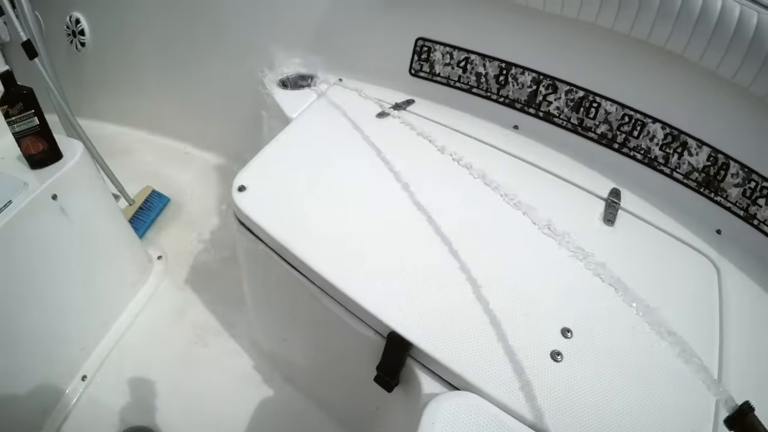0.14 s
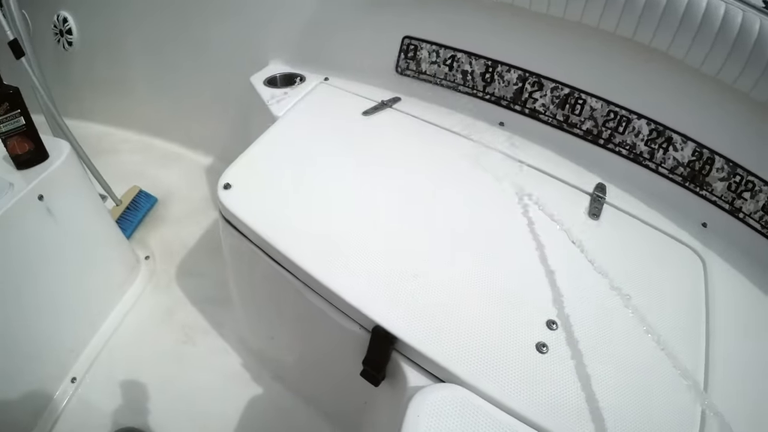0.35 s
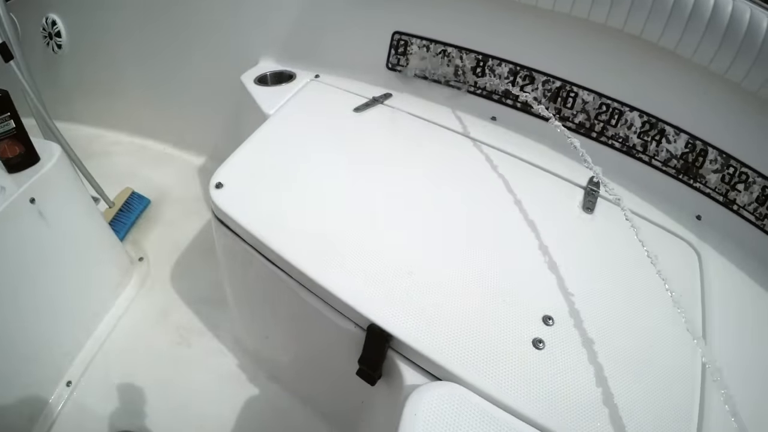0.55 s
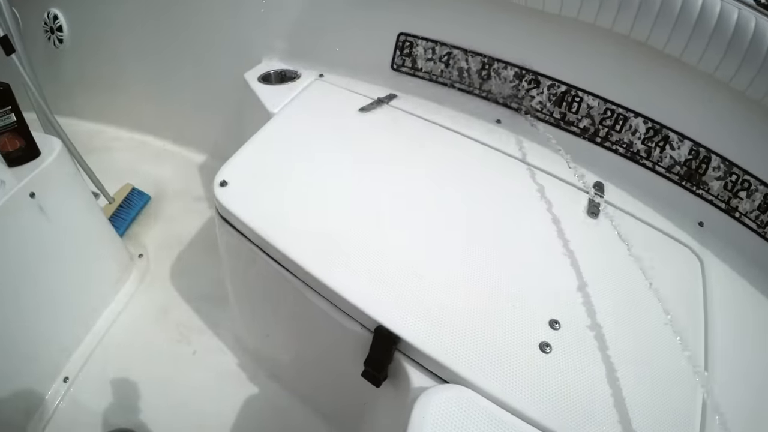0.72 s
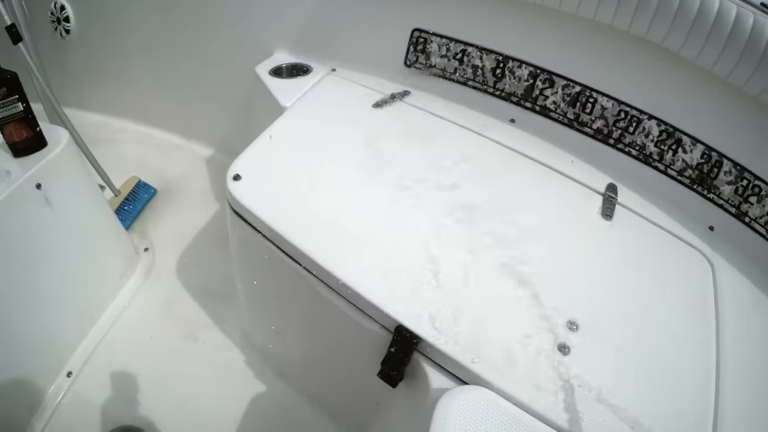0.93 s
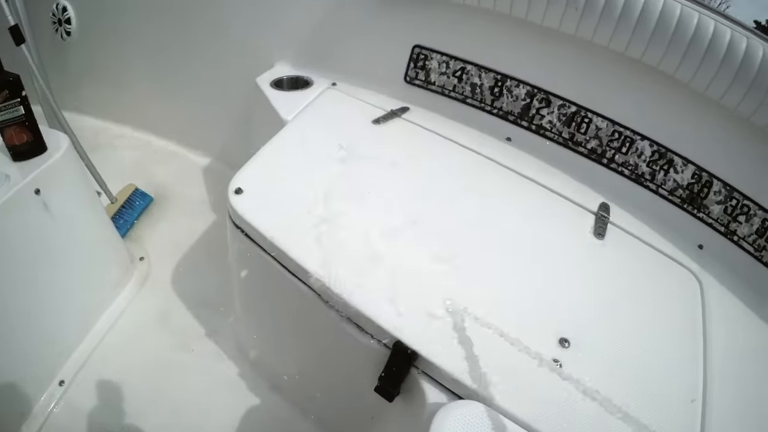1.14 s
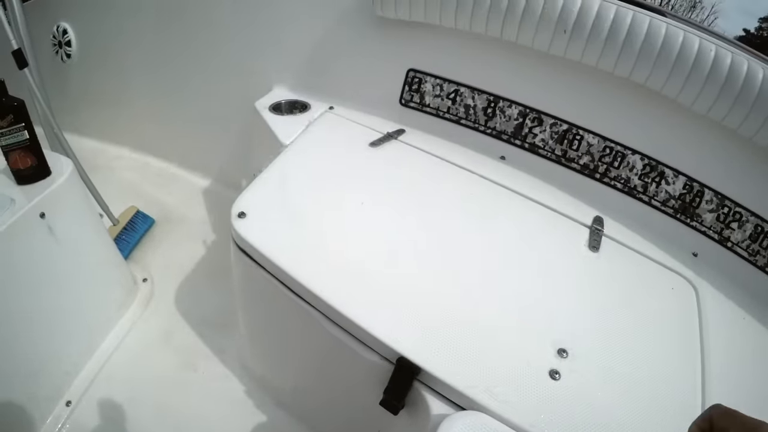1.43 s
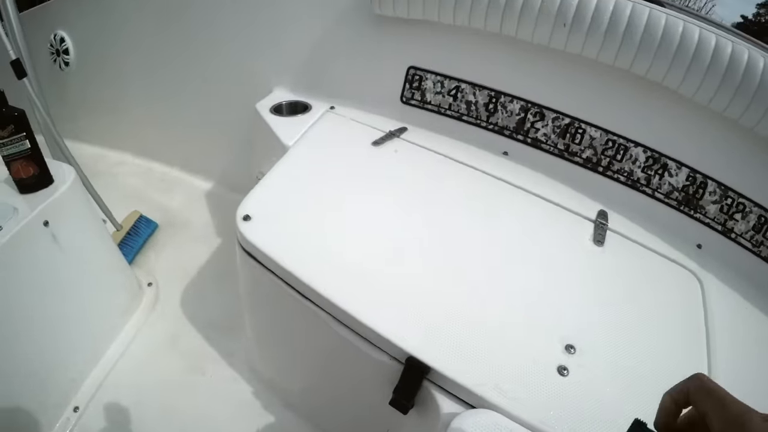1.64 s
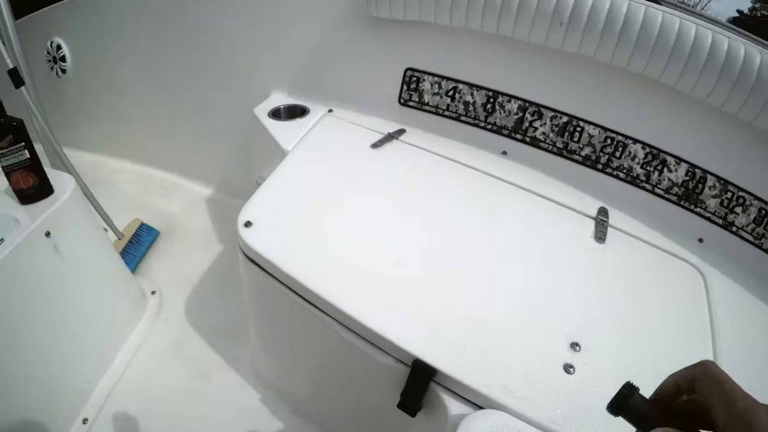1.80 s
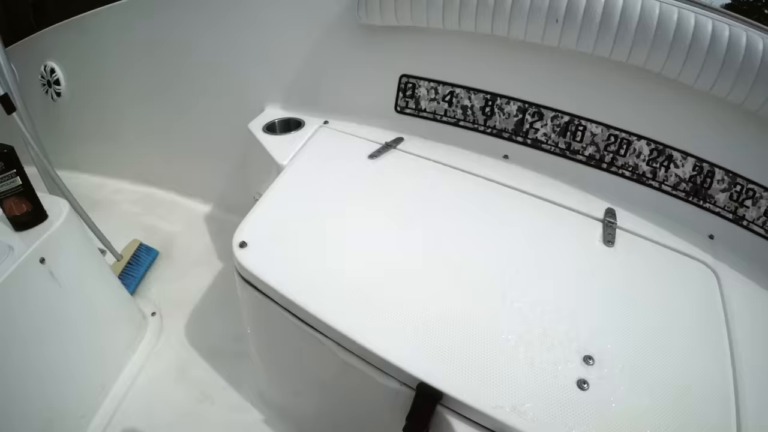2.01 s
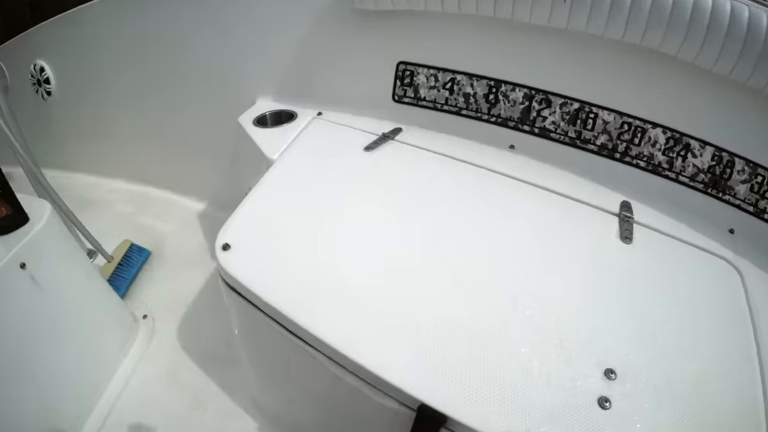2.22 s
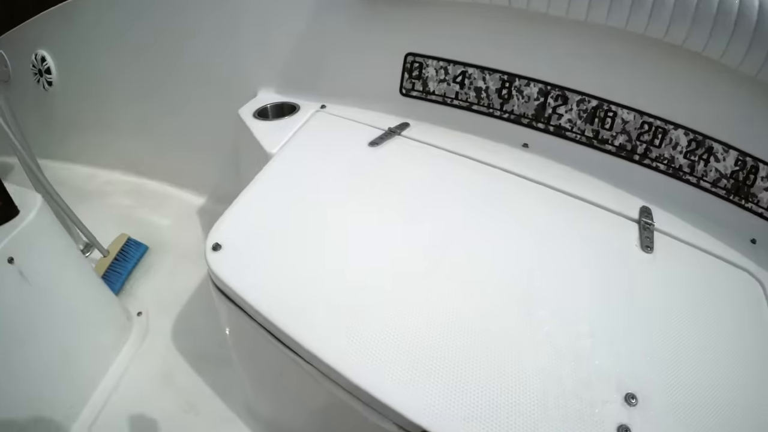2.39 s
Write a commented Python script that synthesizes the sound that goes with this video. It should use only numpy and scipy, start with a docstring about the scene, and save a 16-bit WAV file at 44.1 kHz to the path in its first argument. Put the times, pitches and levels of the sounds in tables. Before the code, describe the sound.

Hose spray spatters and drums on hard fibreglass, stops abruptly, nozzle lever clicks, near quiet follows

```python
"""Garden hose on a boat deck

A jet sweeps over a fibreglass deck: random drops patter, damped rings of bubbles make fizz, gurgle
and plops, and the modes of the hollow side wall drum. The jet stops with a soft thump, the nozzle
clacks and ticks (noise bursts with metal modes), and a faint motor hum and a low rumble of random
thuds remain in soft outdoor noise. The hard cockpit walls add a short echo to water and nozzle."""
import sys
import numpy as np
from scipy import signal
from scipy.fft import rfft, irfft
from scipy.io import wavfile
from scipy.ndimage import uniform_filter1d, map_coordinates

SR = 44100
rng = np.random.default_rng(int(sys.argv[2]) if len(sys.argv) > 2 else 0)


def transcribe(signal):
    """Save signal, clipped to [-1, 1], as a 16-bit WAV file at the path in sys.argv[1]."""
    frames = np.atleast_2d(signal).T
    limited = np.clip(frames, -1, 1)
    pcm = np.round(limited * 32767).astype(np.int16)
    wavfile.write(sys.argv[1], SR, pcm)


N = 112454  # samples in the scene


def undb(db):
    """Logarithmic level: amplitude gain from decibels."""
    return 10 ** (np.asarray(db) / 20)


def unit(x):
    """Normalisation: scale to rms 1."""
    return x / np.sqrt(np.mean(x ** 2) + 1e-18)


def curve(rows, channels=1):
    """Level envelope: one dB column, interpolated linearly in time, as a gain."""
    rows = np.array(rows)
    return undb(np.interp(np.arange(N) / SR, rows[:, 0], rows[:, channels]))


def walk(rate):
    """Low-passed randomness: `rate` random values per second, joined smoothly, at rms 1."""
    hold = max(int(SR / rate), 2)
    steps = np.repeat(rng.standard_normal(N // hold + 1), hold)
    return unit(uniform_filter1d(steps, hold)[:N])


def fade(t60):
    """Exponential decay: 60 dB down after t60 seconds, cut at a quarter of a second."""
    return np.exp(-np.log(1000) * np.arange(SR // 4) / SR / t60)


def colour(x, points):
    """Minimum-phase filtering: a causal response with the given spectral outline, at unit energy."""
    hz, db = np.array(points).T
    size = 8192
    bins_hz = np.arange(size // 2 + 1) * SR / size + 1
    outline_db = np.interp(np.log(bins_hz), np.log(hz), db)
    cepstrum = irfft(np.log(undb(outline_db)))
    # Folding the cepstrum onto positive times makes the response causal.
    folded = np.r_[cepstrum[0], 2 * cepstrum[1:size // 2]]
    response = irfft(np.exp(rfft(folded, size)))
    return signal.fftconvolve(x, response / np.linalg.norm(response))[:len(x)]


def band(x, hz, width):
    """Resonant filtering: a peak of the given relative width applied twice, scaled to rms 1."""
    b, a = signal.iirpeak(hz, hz / min(hz * width, SR / 4), fs=SR)
    once = signal.lfilter(b, a, x)
    return unit(signal.lfilter(b, a, once))


def highpass(x, hz):
    """High-pass filtering: attenuate the bass below hz."""
    return signal.sosfilt(signal.butter(2, hz, "high", fs=SR, output="sos"), x)


def ring(modes):
    """Modal superposition: the struck response is a sum of damped sines."""
    t = np.arange(SR // 4) / SR
    return sum(undb(db) * np.sin(2 * np.pi * hz * t) * fade(t60) for hz, db, t60 in modes)


def add(out, at, x):
    """Linear superposition: mix x in at a time in seconds."""
    i = max(int(at * SR), 0)
    out[i:i + len(x)] += x[:max(len(out) - i, 0)]


def impacts(rate, scatter_db):
    """Random pulse train: impacts of either sign, many small and a few large, at rms 1."""
    hits = (rng.random(N) < rate / SR) * rng.choice([-1, 1], N)
    size = np.minimum(rng.exponential(size=N), 5)
    return unit(hits * undb(scatter_db * size))


RING_RISE = 0.08  # fractional rise in pitch over the ring
RING_ATTACK_CYCLES = 0.58


def damped_ring(hz, cycles):
    """Damped resonance, as of a bubble: a slightly rising pitch falls 40 dB over its cycles."""
    turns = np.arange(int(cycles * SR / hz) + 2) * hz / SR
    age = turns / cycles
    attack = 1 - np.exp(-turns / RING_ATTACK_CYCLES)
    tone = np.sin(2 * np.pi * turns * (1 + RING_RISE * age / 2))
    return tone * attack * np.exp(-np.log(100) * age)


BUBBLE_SCATTER_DB = 3


def froth(hz, octaves, rate, cycles, seconds):
    """Incoherent superposition: bubbles of mixed sizes, about rms 1 over their span of births."""
    out = np.zeros(N)
    for at, size, length, pitch in rng.random((int(rate * seconds) + 1, 4)):
        # Logistic spread of pitch, near 1 in deviation.
        spread = np.log((pitch + .01) / (1.01 - pitch)) / np.sqrt(np.pi)
        gain = undb(-BUBBLE_SCATTER_DB * np.log(size + 0.018))
        bubble = damped_ring(hz * 2 ** (octaves * spread), cycles * (.5 + length))
        add(out, at * seconds, gain * bubble)
    return unit(out) * np.sqrt(seconds * SR / N)


# The jet sweeping over deck, seam and wall, then shut off; levels before the trims below:
# [t/s, patter and spray level/dB, fizz of small bubbles level/dB, gurgle of larger bubbles level/dB]
WATER = [(0,-34,-36.5,-49),(.215,-41.5,-45,-49.5),(.285,-18,-11,-16.5),(.32,-21.5,-20,-18),(.338,-27.5,-26.5,-29),(.415,-27.5,-20.5,-24),(.46,-35,-33.5,-43.5),(.588,-39.5,-39.5,-41),
         (.62,-22,-22.5,-23),(.66,-22.5,-22.5,-24.5),(.71,-32.5,-35.5,-39.5),(.78,-22,-17,-26),(.828,-29.5,-23.5,-26.5),(.85,-13,-17.5,-22.5),(.879,-27,-26,-32),(.895,-11,-12.5,-16),(.95,-20.5,-19.5,-34.5),
         (1.01,-31,-32.5,-45),(1.19,-28,-31.5,-48),(1.24,-32.5,-36,-41.5),(1.375,-35.5,-31.5,-50),(1.45,-26,-33,-38),(1.48,-47.5,-48,-47.5),(2.1,-81.5,-81,-73)]
# Spectral outline of drops on the deck: [f/Hz, relative level/dB]
PATTER_COLOUR = [(300,-16.5),(3000,-12),(5500,0.5),(7500,-3),(11000,-8.5),(15500,-12)]
DROPS_PER_S, DROP_SCATTER_DB, PATTER_DB = 7600, 5.5, -1
SPURT_DB, SPURTS_PER_S = 1.5, 90
# Bubble clouds: centre pitch, spread of pitch, births per second, cycles of ringing, trim
SPRAY_HZ, SPRAY_OCTAVES, SPRAY_PER_S, SPRAY_CYCLES, SPRAY_DB = 7840, 0.44, 2000, 45, -3.5
FIZZ_HZ, FIZZ_OCTAVES, FIZZ_PER_S, FIZZ_CYCLES, FIZZ_DB = 3763, 0.2556, 1300, 26, -2
GURGLE_HZ, GURGLE_OCTAVES, GURGLE_PER_S, GURGLE_CYCLES, GURGLE_DB = 2090, 0.34, 1600, 37, -1.5


def jet():
    """Impact noise and bubble resonance: an uneven stream patters and churns air into the water film."""
    spurts = unit(undb(SPURT_DB * walk(SPURTS_PER_S)))
    patter = colour(impacts(DROPS_PER_S, DROP_SCATTER_DB), PATTER_COLOUR) * undb(PATTER_DB)
    spray = froth(SPRAY_HZ, SPRAY_OCTAVES, SPRAY_PER_S, SPRAY_CYCLES, N / SR) * undb(SPRAY_DB)
    fizz = froth(FIZZ_HZ, FIZZ_OCTAVES, FIZZ_PER_S, FIZZ_CYCLES, N / SR) * undb(FIZZ_DB)
    gurgle = froth(GURGLE_HZ, GURGLE_OCTAVES, GURGLE_PER_S, GURGLE_CYCLES, N / SR) * undb(GURGLE_DB)
    drops = (patter + spray) * curve(WATER)
    bubbles = fizz * curve(WATER, channels=2) + gurgle * curve(WATER, channels=3)
    return spurts * (drops + bubbles)


MIRROR_LAG_S, MIRROR_WANDER_S, MIRROR_GAIN = .0013, .00035, .38


def mirrored(x):
    """Comb-filter interference: a wall reflection whose lag wanders as the jet moves."""
    lag = (MIRROR_LAG_S + MIRROR_WANDER_S * walk(14)) * SR
    reflection = map_coordinates(x, [np.arange(N) - lag])
    return (x + MIRROR_GAIN * reflection) / np.hypot(1, MIRROR_GAIN)


THUDS_PER_S, THUD_SCATTER_DB = 1400, 0.5
SPOT_S, OFF_SPOT_DB = 0.06, -14.5  # time scale of crossing a spot, drive of a mode elsewhere


def panel(outline, modes, ring_db, strength):
    """Modal excitation: random thuds drive each mode most as the jet crosses its best spot."""
    thuds = impacts(THUDS_PER_S, THUD_SCATTER_DB)
    ringing = 0
    for hz, db, t60, at in modes:
        drive = undb(OFF_SPOT_DB) + np.exp(-((np.arange(N) / SR - at) / SPOT_S) ** 2)
        mode = unit(signal.fftconvolve(thuds, ring([(hz, 0, t60)]))[:N])
        ringing = ringing + undb(db) * drive * mode
    return strength * (unit(colour(thuds, outline)) + undb(ring_db) * ringing)


# Hollow panels: drumming under the jet, and a deep boom that stays on faintly as a low rumble;
# levels before the trims below: [t/s, drumming level/dB, deep boom level/dB]
PANELS = [(0,-50.5,-49),(.2,-49,-44.5),(.345,-32.5,-35.5),(.608,-56,-59.5),(.632,-15.5,-29),(.664,-17,-22),(.74,-23,-20.5),(.845,-22.5,-35),
          (.98,-46.5,-51.5),(1.135,-38.5,-41),(1.24,-46,-46),(1.53,-48.5,-45.5),(1.9,-80,-54),(2.5,-66,-54)]
# Spectral outlines of drumming and boom: [f/Hz, relative level/dB]
DRUM_COLOUR = [(150,-28.5),(300,-8),(430,0),(650,-6),(1100,-6.5),(1600,-19.5),(4000,-35)]
BOOM_COLOUR = [(30,-50.5),(115,-6),(220,-3.5),(330,-16.5),(2000,-53)]
# Panel modes: [f/Hz, relative level/dB, t60/s, t/s when the jet crosses the best-driving spot]
DRUM_MODES = [(484.5,2,0.05,.66),(587.3,1.5,0.18,.835),(688,-6.5,0.054,.77)]
BOOM_MODES = [(229,0.00025,0.22,0.686)]
# Heavy blows of the jet on the hollow wall: [t/s, level/dB, f/Hz, cycles of ringing]
KNOCKS = [(.6535,-13,480,24),(.6582,-4.5,213.4,15.7),(.7316,-15,125,7.2)]
DRUM_DB, BOOM_DB, DRUM_RING_DB, BOOM_RING_DB = -3, -4, 0, -1


def hull():
    """Plate vibration: drumming, heavier knocks, and a boom that stays on as a faint low rumble."""
    drum = panel(DRUM_COLOUR, DRUM_MODES, DRUM_RING_DB, curve(PANELS))
    boom = panel(BOOM_COLOUR, BOOM_MODES, BOOM_RING_DB, curve(PANELS, channels=2))
    out = drum * undb(DRUM_DB) + boom * undb(BOOM_DB)
    for at, db, hz, cycles in KNOCKS:
        add(out, at, undb(db) * damped_ring(hz, cycles))
    return out


# Distant motor tones: [f/Hz, level/dB relative to the background, before flutter]
HUM = [(113,-4.5),(241,4.5)]
# Outdoor background: [t/s, level/dB]
AIR = [(1.85,-49.5),(2.55,-58)]
# Spectral outline of the outdoor noise: [f/Hz, relative level/dB]
AIR_COLOUR = [(20,-16.5),(110,0),(230,-2),(1100,-15),(2000,-29),(3200,-24.5),(15000,-48.5)]
HUM_WAVER, HUM_FLUTTER_DB = .02, 3.2  # rms fraction of pitch, rms change in level


def background():
    """Frequency and amplitude modulation: a wavering motor hum in soft outdoor noise."""
    hum = 0
    for hz, db in HUM:
        flutter = undb(db + HUM_FLUTTER_DB * walk(23.97))
        pitch = hz * (1 + HUM_WAVER * walk(25))
        hum = hum + flutter * np.sin(2 * np.pi * np.cumsum(pitch) / SR)
    return (hum + colour(rng.standard_normal(N), AIR_COLOUR)) * curve(AIR)


# Single damped rings: bubble plops, and a faint ringing of the nozzle tick at 1.79 s:
# [t/s, level/dB, f/Hz, cycles of ringing]
SINGLE_RINGS = [(0.203,-19,4060,46),(0.3148,-4,1400,21.6),(0.62,4.5,3700,11),(0.7245,-11.5,6540,77),(1.313,-9.5,3900,37),(1.633,-20.5,6400,64),(1.789,-38,4730,110)]
# Clumps of drops that land together and burst into bubbles: [t/s, level/dB, f/Hz, length/s]
SPATTERS = [(0.342,-27,2340,0.052),(.385,-27.5,2550,0.049),(.553,-34.5,1448,.028),(.597,-26,3830,.02),(.635,-21.5,4250,.045),(0.833,-19,1894,.014),(0.925,-18,8700,0.011),(1.079,-29,4100,0.0058),
            (1.119,-40,967,.025),(1.124,-30,8800,.015),(1.131,-19.5,4000,0.0074),(1.192,-29,3400,0.021),(1.202,-25.5,6500,0.0095),(1.397,-29.5,3060,.02)]
# Slugs of water slapping the wall: [t/s, level/dB, centre f/Hz]
SLAPS = [(0.235,-16.5,5220),(0.2729,-9,4000),(.660,-6,4200),(0.7803,-4,2967),(0.7851,2,3066),(0.7902,-6,10890),(0.8178,-6,3400),(0.833,1.5,1833),(0.8869,-4.5,2900),(.8971,-1.5,2600),(0.9873,-7.5,4700),(1.113,-13.5,8900),(1.1717,-16.5,8100)]
SPATTER_OCTAVES, SPATTER_PER_S, SPATTER_CYCLES = 0.18, 2900, 18
SLAP_T60_S, SLAP_WIDTH = 0.018, 0.72  # width relative to the centre frequency


def splashes_and_rings():
    """Damped resonance and impact noise: plops, a tick's ringing, bubble bursts and water slaps."""
    out, decay = np.zeros(N), fade(SLAP_T60_S)
    for at, db, hz, cycles in SINGLE_RINGS:
        add(out, at, undb(db) * damped_ring(hz, cycles))
    for at, db, hz, seconds in SPATTERS:
        for _ in range(2):  # two independent clouds per clump
            cloud = froth(hz, SPATTER_OCTAVES, SPATTER_PER_S, SPATTER_CYCLES, seconds)
            add(out, at, undb(db) * cloud)
    for at, db, hz in SLAPS:
        add(out, at, undb(db) * decay * band(rng.standard_normal(len(decay)), hz, SLAP_WIDTH))
    return out


JOLT_S, JOLT_LENGTH_S, JOLT_HZ, JOLT_DB = 1.506, 0.081, 94, -41


def jolt():
    """Band-limited transient: the hose jolts with a soft low thump as the flow is cut."""
    swell = np.exp(-((np.arange(N) / SR - JOLT_S) / JOLT_LENGTH_S) ** 2)
    return undb(JOLT_DB) * swell * band(rng.standard_normal(N), JOLT_HZ, 3.4)


# The nozzle's lever snapping back: [t/s, level/dB]
CLACKS = [(1.664,-34),(1.6699,-17.5),(1.6755,-26.5)]
# Spectral outline of the clack: [f/Hz, relative level/dB]
CLACK_COLOUR = [(300,-31),(1100,-15),(1700,-10),(3600,10.5),(5000,2.5),(7000,4),(15500,-22)]
# Ringing of the nozzle and of its metal fitting: [f/Hz, relative level/dB, t60/s]
NOZZLE_MODES = [(1600,-16,0.19),(1790,-8,0.13),(3020,-11.5,0.21),(4230,-14,0.063)]
FITTING_MODES = [(5996,0,0.061),(6950,0.5,0.049),(8250,-7,0.039),(9100,-3,.042)]
# Light ticks of the fitting: [t/s, level/dB, brightest f/Hz]
TICKS = [(1.722,-48,11950),(1.791,-47,10500),(1.837,-29.5,7350)]
CLACK_T60_S, CLACK_RING_DB = 0.053, -12.5
RATTLE_HZ, RATTLE_WIDTH, RATTLE_T60_S, RATTLE_DB = 2500, 1.04, 0.11, -10
TICK_WIDTH, TICK_NOISE_DB, TICK_TOP_RATIO = 0.68, -6, 1.26  # top ratio: cutoff over brightest f


def nozzle():
    """Impulsive modal excitation: the lever clacks home and the metal fitting ticks."""
    out, decay = np.zeros(N), fade(CLACK_T60_S)
    for at, db in CLACKS:
        crack = colour(rng.standard_normal(len(decay)) * decay, CLACK_COLOUR)
        noise = band(rng.standard_normal(len(decay)), RATTLE_HZ, RATTLE_WIDTH)
        rattle = undb(RATTLE_DB) * fade(RATTLE_T60_S) * noise
        add(out, at, undb(db) * (crack + rattle + undb(CLACK_RING_DB) * ring(NOZZLE_MODES)))
    for at, db, hz in TICKS:
        noise = undb(TICK_NOISE_DB) * 2 * rng.standard_normal(len(decay)) * decay
        tick = band(ring(FITTING_MODES) / 2 + noise, hz, TICK_WIDTH)
        soften = signal.butter(5, min(hz * TICK_TOP_RATIO, SR * .45), fs=SR, output="sos")
        tick = signal.sosfilt(soften, tick)
        onset_level = np.std(tick[:SR // 200])  # over the first 5 ms
        add(out, at, undb(db) * tick / onset_level)
    return out


COCKPIT_T60_S, COCKPIT_DB, COCKPIT_DELAY_S = 0.12, -10.5, 0.0029


def cockpit(x):
    """Reverberation: direct sound plus close, quickly fading wall reflections."""
    decay = fade(COCKPIT_T60_S)
    arrived = np.arange(len(decay)) > COCKPIT_DELAY_S * SR
    tail = rng.standard_normal(len(decay)) * decay * arrived
    wet = signal.fftconvolve(x, tail / np.linalg.norm(tail))[:N]
    return (x + undb(COCKPIT_DB) * wet) / np.hypot(1, undb(COCKPIT_DB))


WATER_LOW_HZ, HULL_LOW_HZ = 580, 74.07


def scene():
    """Superposition of sources: drops and bubbles radiate little bass; water and nozzle echo."""
    water = highpass(mirrored(jet()) + splashes_and_rings(), WATER_LOW_HZ)
    wall = highpass(hull(), HULL_LOW_HZ)
    return (cockpit(water + nozzle()) + wall + background() + jolt())[None]


TOP_HZ = 15500


def record(dry):
    """Clipping and band limitation: peaks overload the microphone and the top is cut."""
    clipped = np.clip(dry, -1, 1)
    return signal.sosfilt(signal.ellip(10, .2, 70, TOP_HZ, fs=SR, output="sos"), clipped)


dry = scene()
out = record(dry)
transcribe(out)
```